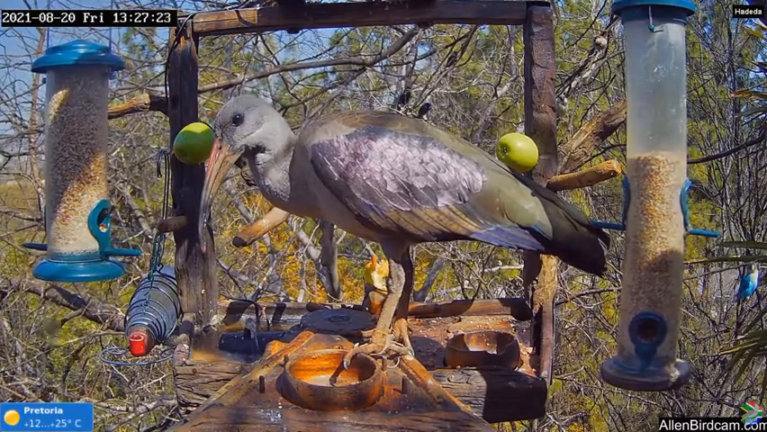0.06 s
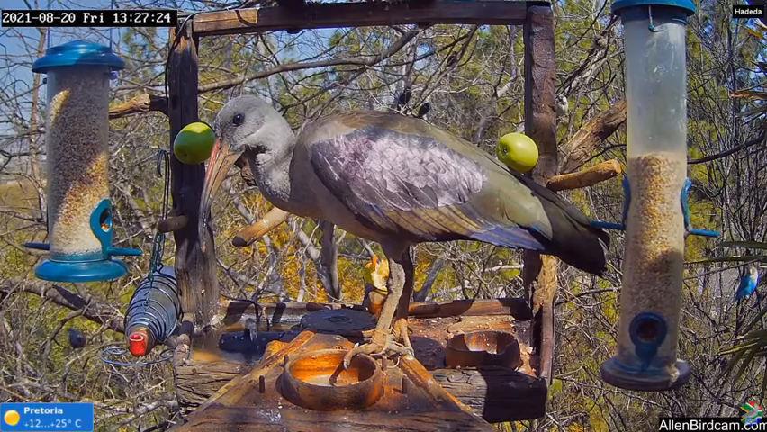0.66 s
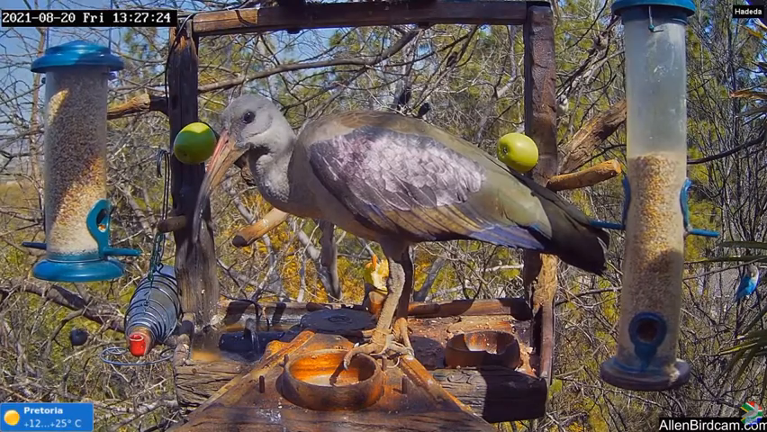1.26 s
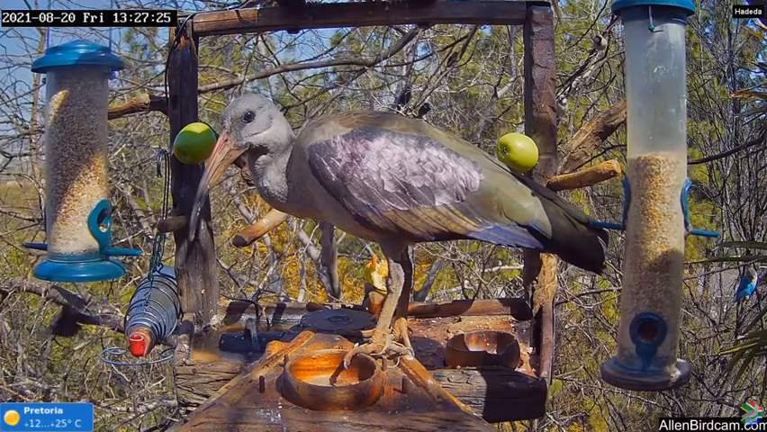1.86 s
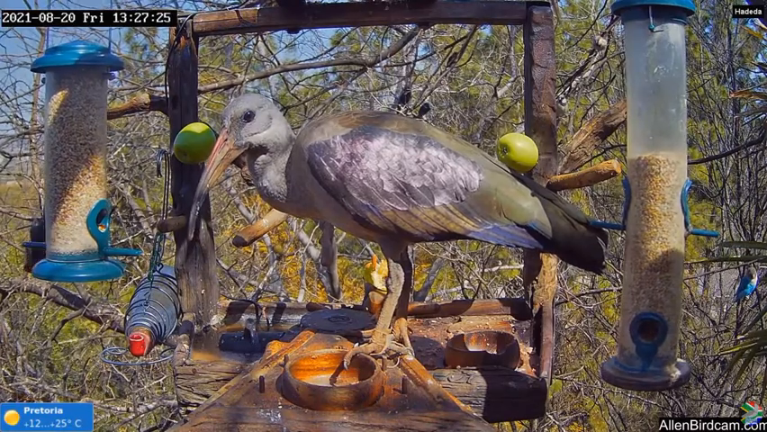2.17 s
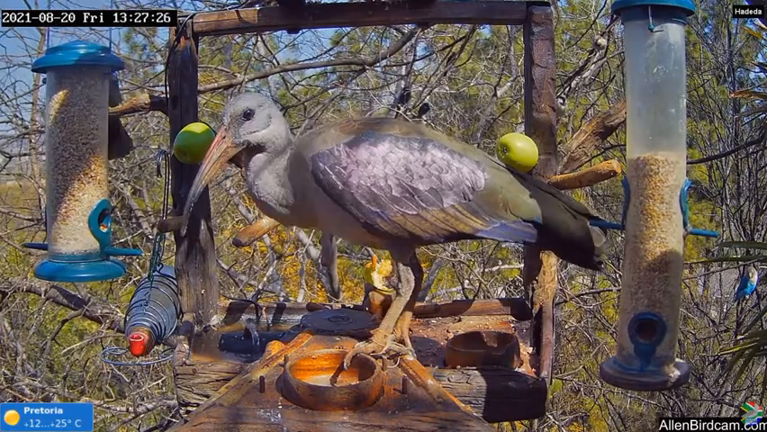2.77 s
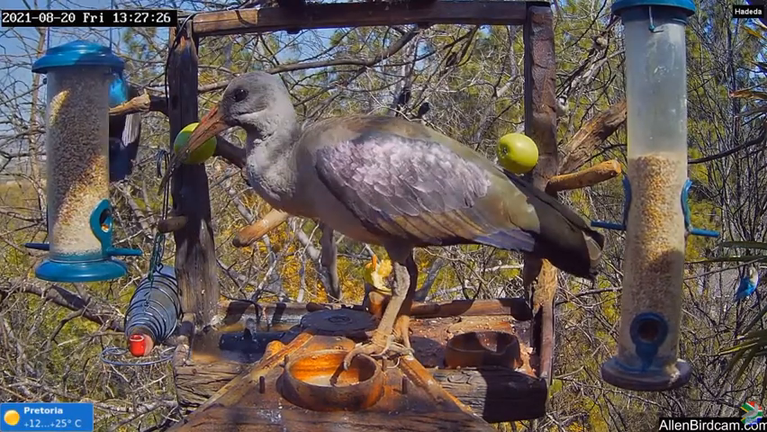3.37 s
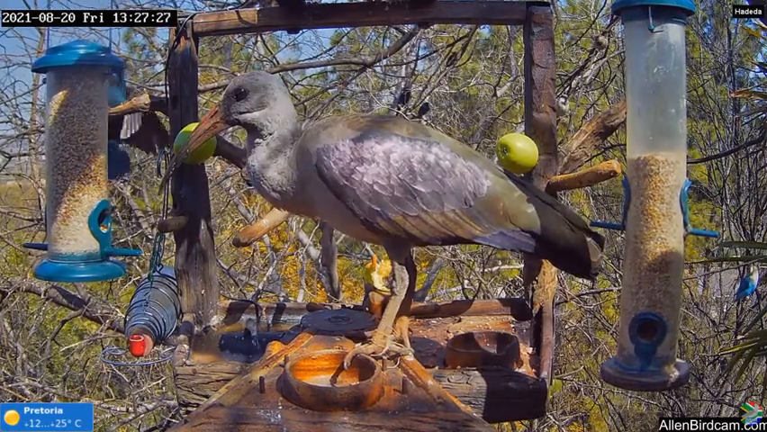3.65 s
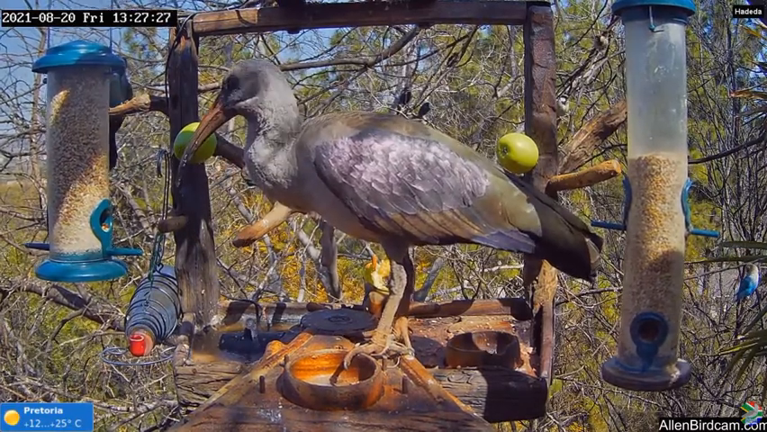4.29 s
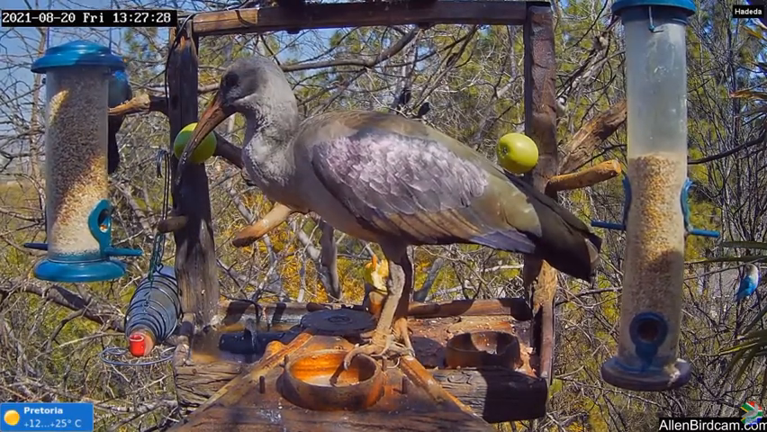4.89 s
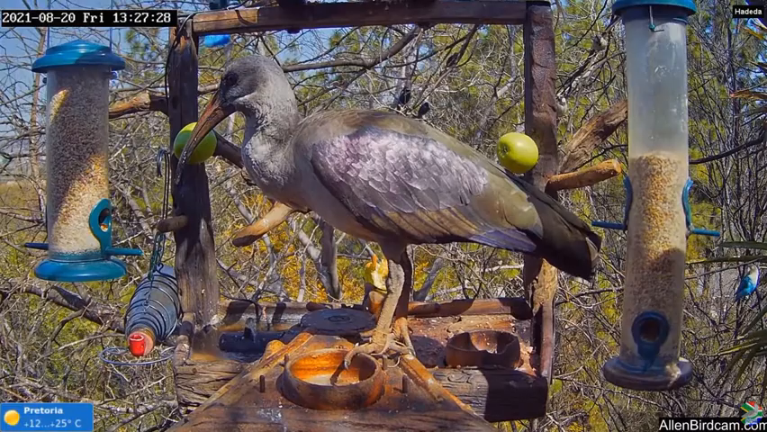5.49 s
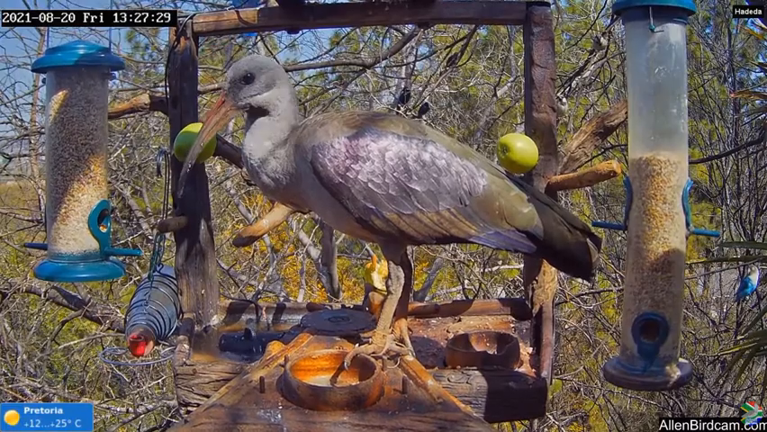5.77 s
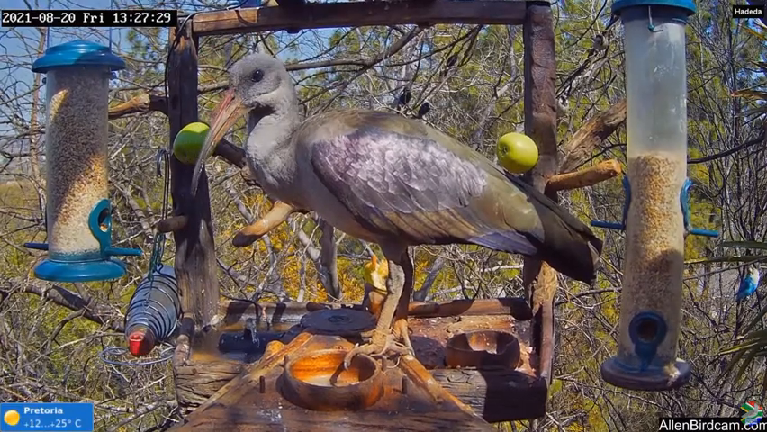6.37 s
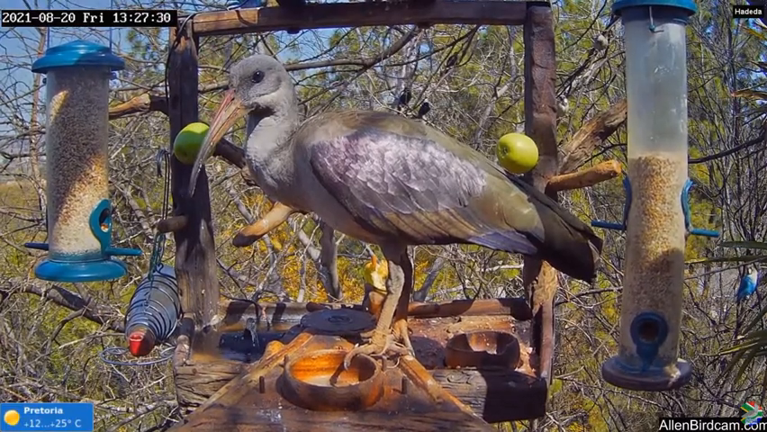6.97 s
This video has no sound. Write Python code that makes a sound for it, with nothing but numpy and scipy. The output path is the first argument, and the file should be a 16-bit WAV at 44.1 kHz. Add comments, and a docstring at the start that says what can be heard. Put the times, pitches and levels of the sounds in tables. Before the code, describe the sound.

Close, regular chirps and a quick burst of harsh squeaks sound over faraway birdsong and a soft wind rumble.

```python
"""Small birds at a garden feeder

Close to the microphone one bird repeats a sharp falling chirp, a near-pure tone from the syrinx, while
others squabble in harsh, overdriven squeaks. Wings puff air, beaks tap, the feeder shudders at a landing.
Further off in the dry trees, which scatter every call, are whistles, twitter, a pulsing churr and doves.
Light wind rumbles on the microphone over quiet garden air and, late on, a faint drone."""
import sys
import numpy as np
from scipy import signal
from scipy.fft import rfft, irfft
from scipy.io import wavfile
from scipy.ndimage import uniform_filter1d

SR = 44100
rng = np.random.default_rng(int(sys.argv[2]) if len(sys.argv) > 2 else 0)


def dump(signal):
    """Clip the signal to [-1, 1] and save it as 16-bit WAV at the path in sys.argv[1]."""
    limited = np.clip(np.atleast_2d(signal).T, -1, 1)
    pcm = np.round(limited * 32767).astype(np.int16)
    wavfile.write(sys.argv[1], SR, pcm)


N = 310464
T = np.arange(N) / SR

# Table levels are relative: each source's trim and the mix in scene() come on top.
# spectrum of the garden air: f/Hz, level/dB
AIR_SPECTRUM = [(30, -4.5), (70, -1), (130, -2.5), (220, -6.5), (310, -2), (400, -11.5), (530, -7.5),
                (800, -9.5), (1200, -20.5), (2200, -25.5), (4500, -31), (8000, -34), (15500, -39)]
# slow swell of the air's low part: t/s, level/dB
AIR_SWELL = [(0.1, -91), (2.62, -88.5), (3.55, -89.5), (4.21, -84), (6.9, -89)]
# wind on the microphone: t/s, slow eddies/dB, quick eddies/dB
GUSTS = [(0.02, -39, -50.5), (0.29, -35.5, -42.5), (0.33, -46, -44.5), (0.39, -38.5, -57.5),
         (0.55, -46.5, -54), (0.78, -41.5, -60.5), (1.07, -42.5, -44), (1.29, -43.5, -56.5),
         (1.58, -42.5, -49), (1.69, -47.5, -70.5), (1.97, -40.5, -52), (2.18, -44.5, -58.5),
         (2.22, -56.5, -79), (2.44, -53, -69), (2.57, -40.5, -55.5), (2.86, -44.5, -64.5), (2.92, -68, -54),
         (3.25, -75, -88), (3.8, -71.5, -80.5), (3.88, -47, -66), (4.04, -58, -74), (4.29, -45.5, -54.5),
         (4.4, -53.5, -68), (4.7, -48.5, -61.5), (5.85, -64, -91), (6.16, -52, -62), (6.22, -54, -77),
         (7.02, -65, -89)]
# spectra of the slow and the quick eddies: f/Hz, level/dB
SLOW_EDDY_SPECTRUM = [(10, -8.5), (22, 0), (40, -11.5), (55, -20), (90, -43.5), (200, -96.5)]
QUICK_EDDY_SPECTRUM = [(30, -28.5), (55, 8.5), (70, 0.5), (100, -8), (140, -19.5), (250, -37.5),
                       (600, -85.5)]
# distant flocks: start/s, end/s, centre f/Hz, spread/octaves, note length/s, level/dB, notes per second
FAR_FLOCKS = [(0, 7, 2860, 0.54, 0.048, -87.5, 9.5), (1.092, 4.0, 5050, 0.4, 0.017, -84, 22),
              (5.3, 7.03, 5700, .36, 0.018, -77.5, 120), (5.297, 6.9, 8700, .3, 0.0079, -88, 80)]
# coos of the nearest dove: t/s, length/s, f/Hz, level/dB
DOVE_COOS = [(.375, 0.039, 491.4, -66), (.46, 0.058, 508.5, -65.5), (.52, 0.046, 530.6, -63.5),
             (.605, 0.045, 506, -67.5), (.725, 0.029, 505.7, -64.5), (.785, 0.023, 531, -63),
             (.935, 0.045, 484, -67.5), (.97, 0.028, 537, -60.5), (1.84, 0.088, 547, -75.5),
             (6.05, 0.11, 544, -74), (6.48, 0.12, 525, -79)]
# bouts of churring: start/s, loudest/s, end/s, level/dB
CHURR_BOUTS = [(3.89, 4.525, 4.88, -77), (5.113, 5.561, 6.39, -65)]
# pulsing of the churr: t/s, rate/Hz
CHURR_PULSE_RATE = [(3.9, 46.6), (5.2, 35), (5.42, 46.6), (5.63, 47.3), (6.35, 50.6)]
# throat resonance of the churring bird: f/Hz, level/dB
CHURR_THROAT = [(650, -16.5), (1100, -11.5), (1420, -5), (1740, 0.5), (2170, -5.5), (2310, -2),
                (2610, -0.5), (3340, -8.5), (3650, -14), (3960, -16.5), (4920, -12.5), (5300, -27),
                (5600, -41), (7280, -63), (12300, -120)]
# whistles from the trees, and at 3.727 s the held tone that ends one chirp: t/s, length/s, first f/Hz, middle
# f/Hz, last f/Hz, level/dB
WHISTLE_NOTES = [(0.243, 0.031, 2840, 2837, 2910, -66.5), (0.444, 0.074, 3110, 2006, 2070, -69),
                 (0.524, 0.028, 4500, 4310, 3640, -74), (0.558, 0.11, 2800, 3480, 3380, -71.5),
                 (0.588, 0.026, 2960, 2390, 2190, -72.5), (0.611, 0.044, 3280, 3140, 3890, -74),
                 (0.752, 0.042, 2730, 2190, 2070, -79.5), (0.818, 0.12, 1737, 1675, 1756, -73.5),
                 (0.964, 0.11, 1707, 1718, 1610, -74.5), (1.036, 0.074, 1717, 1647, 1636, -72),
                 (1.383, 0.23, 2946, 2679, 2596, -73), (1.754, 0.039, 3430, 3585, 3760, -73),
                 (1.815, 0.085, 3450, 3500, 2940, -84.5), (2.159, 0.12, 1930, 2935, 1910, -66.5),
                 (2.21, 0.12, 2650, 1520, 2060, -78), (2.254, 0.072, 3700, 2934, 2600, -71),
                 (2.323, 0.04, 2610, 3026, 1980, -72), (2.438, 0.052, 2450, 2180, 2070, -70.5),
                 (2.696, 0.089, 2080, 1847, 2050, -77), (2.861, 0.058, 2837, 2847, 2850, -70),
                 (2.915, 0.22, 2000, 2420, 2430, -86.5), (3.37, 0.096, 1980, 2660, 2210, -69),
                 (3.391, 0.21, 2030, 1776, 2310, -69.5), (3.531, 0.052, 2085, 2510, 2170, -69),
                 (3.574, 0.068, 1986, 1610, 1526, -69), (3.577, 0.025, 3800, 3400, 3280, -59.5),
                 (3.727, 0.1, 3400, 3060, 2990, -57), (4.762, 0.042, 3180, 3390, 3100, -69),
                 (5.072, 0.03, 3010, 2315, 2050, -60.5), (5.799, 0.071, 2450, 2184, 2173, -70),
                 (6.647, 0.036, 3096, 2470, 2010, -62), (6.884, 0.021, 3230, 2510, 2170, -65),
                 (6.975, 0.057, 2400, 2130, 2100, -65.5)]
# thin buzzy twitter, and at 1.134 and 3.806 s the high ring and tail of the close chips: t/s, length/s, first
# f/Hz, last f/Hz, level/dB
TWITTER_NOTES = [(0.097, 0.17, 5630, 5420, -81.5), (0.096, 0.19, 6220, 6070, -84.5),
                 (1.134, 0.045, 5300, 5800, -61), (1.619, 0.027, 5120, 7150, -64.5),
                 (2.123, 0.045, 6200, 5260, -68.5), (2.163, 0.084, 6570, 5170, -68.5),
                 (2.713, 0.28, 7870, 8440, -87), (2.927, 0.11, 6630, 4320, -74.5),
                 (3.118, 0.23, 4520, 3930, -82.5), (3.713, 0.096, 6365, 5690, -69),
                 (3.806, 0.03, 5210, 5440, -61.5), (4.389, 0.012, 6640, 6370, -57),
                 (5.289, 0.033, 6280, 6810, -56), (5.502, 0.051, 7040, 5070, -66.5),
                 (5.715, 0.032, 6120, 5960, -67.5), (5.83, 0.089, 6180, 6740, -72),
                 (5.954, 0.048, 6580, 5900, -70), (6.04, 0.041, 7100, 6530, -70),
                 (6.128, 0.022, 4460, 5302, -62.5), (6.152, 0.031, 5890, 7116, -70.5),
                 (6.261, 0.046, 5290, 6648, -70.5), (6.316, 0.037, 6180, 6590, -68),
                 (6.396, 0.026, 6900, 6200, -74), (6.429, 0.0055, 5830, 5400, -53),
                 (6.447, 0.017, 5120, 5140, -68), (6.537, 0.048, 6480, 6080, -63),
                 (6.599, 0.057, 6895, 6210, -68), (6.763, 0.049, 5392, 4830, -73),
                 (6.828, 0.03, 6675, 6230, -67),]
# wing flutters: t/s, length/s, level/dB
FLUTTERS = [(2.426, 0.076, -66), (2.545, 0.1, -67), (2.814, 0.087, -68), (4.986, 0.076, -65.5)]
# beak taps on the feeder: t/s, level/dB
BEAK_TAPS = [(1.732, -70.5), (3.147, -86)]
# throat and beak resonances of the squabbling birds: f/Hz, level/dB
BEAK_SPECTRUM = [(1400, -38.5), (1900, -15.5), (2300, -3), (3200, -5), (4500, 0.5), (5500, -4.5),
                 (6800, -1), (7700, -9), (8700, -10), (10000, -27), (11200, -18), (12000, -62.5),
                 (13200, -25), (15500, -33.5)]
# creaking pulses that lead into squeaks: t/s, level/dB
CREAK_PULSES = [(4.7446, -46), (4.757, -43.5), (4.767, -64), (4.9866, -52), (4.9923, -53), (5.0013, -45)]
# close squeaks: t/s, length/s, first f/Hz, middle f/Hz, last f/Hz, level/dB, roughness,
# warble as a share of the pitch, echo/dB
SQUEAK_NOTES = [ (1.128, 0.054, 2520, 2264, 2430, -65, .7, .04, -2.5),
                (2.011, 0.074, 2930, 2500, 2690, -73, 0.61, 0, -3),
                (3.803, .024, 2667, 2840, 2930, -61, 1.06, 0.0092, 0),
                (4.404, 0.026, 2860, 2210, 2090, -61, .15, 0.016, -8),
                (4.431, 0.027, 1810, 2330, 1940, -59.5, 0.3, 0.042, -11),
                (4.453, 0.0098, 4380, 3430, 2470, -56, 0.05, 0.061, -5),
                (4.465, 0.025, 2050, 1870, 1920, -59, .15, 0.013, -15),
                (4.483, 0.025, 2670, 2810, 2690, -56.5, 0.32, 0, -8.5),
                (4.771, 0.015, 4640, 4600, 4660, -48, 0.86, 0, -14),
                (4.7805, 0.03, 4670, 4550, 4800, -38.5, 0.47, .11, -14),
                (4.805, 0.0089, 5700, 6450, 6550, -32.5, 0.37, 0.024, -16.5),
                (5.0077, 0.0053, 2670, 2950, 2370, -39.5, 0.25, 0, -11),
                (5.014, 0.028, 2248, 2156, 2244, -43.5, 0.05, 0.018, -17),
                (5.036, 0.011, 3960, 6260, 6850, -35, 0.42, 0.0027, -15),
                (5.199, 0.078, 2170, 2370, 2490, -67.5, 0.27, 0.017, -1),
                (5.254, 0.033, 2504, 2800, 2990, -61, 1.06, 0.041, -5),
                (6.72, 0.025, 2226, 2630, 2550, -63.5, 0.77, 0.12, 1.5)]
# the chirp's two-step fall, timed from its start: t/s, f/Hz, level/dB
CHIRP_FALL = [(.006, 2900, -17), (.017, 4380, -3.5), (.031, 4200, -2.5), (.045, 3540, -5.5),
              (.053, 4650, 1), (.0595, 2850, -11), (.068, 3450, -3), (.078, 3480, -1), (.114, 2580, -13)]
# its opening upstroke, from the other side of the syrinx: t/s, f/Hz, level/dB
CHIRP_UPSTROKE = [(-.014, 4400, -23.5), (.010, 5620, -6), (.014, 6200, -32.5)]
# each repeat of the chirp: t/s, level/dB, pitch ratio
CHIRP_CALLS = [(0.0507, -50.5, 0.98), (1.2601, -50.5, 1.007), (2.561, -50, 1), (3.6491, -50.5, 0.99),
               (4.697, -50.5, 1.0), (5.8915, -51, 1.002)]


def undb(db):
    """Decibels to gain."""
    return 10 ** (np.asarray(db) / 20)


def unit(x):
    """Scale to rms 1."""
    return x / (np.sqrt(np.mean(x ** 2)) + 1e-12)


def curves(rows, t):
    """The columns of a table, joined by straight lines over the times t, with rounded corners."""
    times, *columns = np.transpose(rows)
    return [uniform_filter1d(np.interp(t, np.sort(times), c), size=40, mode="nearest") for c in columns]


def response(spectrum, hz):
    """Gain of a spectrum (f/Hz, level/dB) at the given frequencies."""
    f, db = np.transpose(spectrum)
    return undb(np.interp(np.log(hz + 0.0011), np.log(f), db))


def colour(x, spectrum):
    """Filter by a spectrum (f/Hz, level/dB)."""
    return irfft(rfft(x) * response(spectrum, np.fft.rfftfreq(len(x), 1 / SR)), len(x))


def noise():
    """White noise for the whole scene."""
    return rng.standard_normal(N)


def noise_band(low_hz, high_hz, order=2):
    """Band-passed noise at rms 1."""
    bandpass = signal.butter(order, [low_hz, high_hz], "band", fs=SR, output="sos")
    return unit(signal.sosfilt(bandpass, noise()))


def wander(n, rate):
    """A random curve that takes a new value `rate` times a second."""
    return np.interp(np.arange(n) * rate / SR, np.arange(4096), rng.standard_normal(4096))


def add(out, start, x):
    """Mix x into out from `start` seconds on."""
    i = int(np.clip(start * SR, 0, N))
    out[i:i + len(x)] += x[:N - i]


def progress(length):
    """Runs from 0 to 1 over a note."""
    return np.linspace(0, 1, max(int(length * SR), 16))


def arch(u):
    """Rounded swell and fall of a note."""
    return np.abs(np.sin(np.pi * u)) ** 0.43


def phase_of(hz):
    """Phase of an oscillator that follows a pitch curve."""
    return 2 * np.pi * np.cumsum(hz) / SR


def bend_through(u, pitches_hz):
    """Pitch of a note that bends smoothly through its first, middle and last value."""
    return np.exp(np.polyval(np.polyfit([0, .5, 1], np.log(pitches_hz), 2), u))


def add_from_trees(paths, start, note, db, faint_db=-69.5):
    """Split a note between the direct and the scattered path; fainter birds sit deeper in the trees."""
    direct_share = 0.79 * undb(1.1 * min(db - faint_db, 0))
    add(paths[0], start, np.sqrt(direct_share) * note)
    add(paths[1], start, np.sqrt(1 - direct_share) * note)


def trees(x, early_s, late_s, late_db):
    """Scatter from near branches, then a thin tail from the trees behind."""
    t = np.arange(SR) / SR
    decay = np.exp(-t / early_s) + undb(late_db) * np.exp(-t / late_s)
    echoes = rng.standard_normal(len(t)) * decay * (t > .002)
    return signal.fftconvolve(x, echoes / np.sqrt(np.sum(echoes ** 2)))[:N]


def air(level_db=-79, swell_depth=0.76):
    """Far-off garden ambience: the low part swells slowly, the hiss stays even."""
    swell_db, = curves(AIR_SWELL, T)
    bed = unit(colour(noise(), AIR_SPECTRUM)) * undb(level_db)
    low = colour(bed, [(1000, 0), (1600, -10), (2500, -60)])
    drift_db = .8 * wander(N, 6)
    return bed - low + low * undb(swell_depth * (swell_db - np.median(swell_db)) + drift_db)


def hum(hz=99, db=-78, start_s=5.3):
    """A faint, unsteady drone fades in from far away."""
    envelope = undb(db + 2 * wander(N, 6.3)) * np.clip(T - start_s, 0, 1)
    return envelope * np.sin(phase_of(hz * (1 + 0.011 * wander(N, 5.4))))


def wind(trims_db=(2, 2.96), buffet_db=1.5, buffet_hz=14):
    """Slow and quick eddies swell with the breeze and buffet the microphone together."""
    out, buffets = 0, buffet_db * np.tanh(wander(N, buffet_hz))
    spectra = SLOW_EDDY_SPECTRUM, QUICK_EDDY_SPECTRUM
    for db, trim_db, spectrum in zip(curves(GUSTS, T), trims_db, spectra):
        eddies = colour(noise(), spectrum)
        strength = np.sqrt(uniform_filter1d(uniform_filter1d(eddies ** 2, size=3000), size=3000))
        out = out + eddies / strength * undb(db + trim_db + buffets)  # the gusts alone set the level
    return out


def far_doves(low_hz=290, high_hz=560, length=.09, count=36):
    """Barely audible coos from the furthest trees, each with its own time, pitch and strength."""
    out, u = np.zeros(N), progress(length)
    for i, (when, pitch, strength) in enumerate(rng.uniform(0, 1, (count, 3))):
        hz = (low_hz + (high_hz - low_hz) * pitch) * (1 + 0.05 * arch(u))
        coo = undb(-86 + 5 * strength) * arch(u) * np.sin(phase_of(hz))
        add(out, T[-1] * (i + when) / count, coo)
    return out


def twit(length, first_hz, last_hz, db, rasp=.034, overtone_db=-33):
    """One thin sliding note with a rasp on its pitch."""
    u = progress(length)
    slide_hz = first_hz + (last_hz - first_hz) * u
    phase = phase_of(slide_hz * (1 + rasp * wander(len(u), 1200)))
    envelope = arch(u ** 1.5) * undb(db + 3.6 * wander(len(u), 250))
    return envelope * (np.sin(phase) + undb(overtone_db) * np.sin(2 * phase))


def flocks():
    """Faint notes of many distant birds; after the squabble they thicken into a twitter."""
    out = np.zeros(N)
    for start, end, centre_hz, octaves, length, db, rate in FAR_FLOCKS:
        count = int(rate * (end - start))
        for i, (when, pitch, slide, strength) in enumerate(rng.uniform(-1.2, 1, (count, 4))):
            hz = centre_hz * 2 ** (octaves * pitch)
            note = twit(length * (1 + 0.27 * when), hz, hz * (.95 + 0.18 * slide), db + 4 * strength)
            add(out, start + (end - start) * (i + when) / count, note)
    return out


def dove(bend=0.07, waver=0.045):
    """Soft, hollow coos some way off, each a little higher in its middle."""
    out = np.zeros(N)
    for start, length, hz, db in DOVE_COOS:
        u = progress(length)
        pitch = hz * (1 + bend * (arch(u) - .8) + waver * wander(len(u), 120))
        add(out, start, undb(db) * arch(u) * np.sin(phase_of(pitch)))
    return out


def churr(swell_db=13.5, sag_db=6.5, sag_s=0.16, fade_s=0.085, brightening=0.4):
    """A dry rattle from the trees: noisy pulses through a broad throat resonance, duller when soft."""
    rate, = curves(CHURR_PULSE_RATE, T)
    cycles = np.cumsum(rate * (1 + .025 * wander(N, 40))) / SR
    since_pulse = cycles % 1 / rate
    pulses = (.33 + np.exp(-since_pulse / .006)) * undb(1.5 * wander(N, 45))
    effort = 0
    for start, loudest, end, db in CHURR_BOUTS:  # each swells, sags to a plateau and stops
        swell = swell_db * np.minimum((T - loudest) / (loudest - start), 0)
        sag = sag_db * (np.exp(-np.maximum(T - loudest, 0) / sag_s) - 1)
        gate = np.clip(np.minimum(T - start, end - T) / fade_s, 0, 1)
        effort = effort + undb(db + swell + sag) * gate
    rattle = unit(colour(noise() * pulses, CHURR_THROAT))
    body = colour(rattle, [(2600, 0), (3000, -20), (4000, -40)])
    return effort * (body + (rattle - body) * (effort / effort.max()) ** brightening)


def whistles(overtone_db=-33, waver=.012, flutter_db=2.5, trim_db=0.88):
    """Pure, bending notes from the trees, and the held tone after one chirp; returns the direct and the
    scattered sound."""
    paths = np.zeros((2, N))
    for start, length, *pitches_hz, db in WHISTLE_NOTES:
        u = progress(length)
        phase = phase_of(bend_through(u, pitches_hz) * (1 + waver * wander(len(u), 250)))
        envelope = arch(u ** 0.71) * undb(db + trim_db + flutter_db * wander(len(u), 90))
        tone = np.sin(phase) + undb(overtone_db) * np.sin(2 * phase)
        add_from_trees(paths, start, envelope * tone, db)
    return paths


def twitter(trim_db=1.2):
    """Thin notes that stand out in front of the flocks, and the high ring of two close chips; returns the
    direct and the scattered sound."""
    paths = np.zeros((2, N))
    for start, length, first_hz, last_hz, db in TWITTER_NOTES:
        add_from_trees(paths, start, twit(length, first_hz, last_hz, db + trim_db), db)
    return paths


def wings(beat_hz=24, feather_db=-27):
    """Each wingbeat pushes a low puff of air, with a faint rustle of feathers."""
    envelope = np.zeros(N)
    for start, length, db in FLUTTERS:
        u = progress(length)
        beats = 1 + 0.15 * np.cos(2 * np.pi * beat_hz * length * u)
        add(envelope, start, undb(db) * arch(u) * beats)
    return envelope * (noise_band(172, 336, order=3) + undb(feather_db) * noise_band(920, 6200))


def feeder(landing_s=2.87, hz=66, db=-46, t60_s=0.42):
    """The feeder's mount shudders after a bird lands."""
    t = np.maximum(T - landing_s, 0)
    return undb(db - 60 * t / t60_s) * np.sin(2 * np.pi * hz * t)


def taps(ring_s=0.0025):
    """Tiny dry clicks of a beak on the plastic feeder."""
    strikes = sum(undb(db) * (T >= at) * np.exp(-np.abs(T - at) / ring_s) for at, db in BEAK_TAPS)
    return strikes * noise_band(6000, 8500)


def creaks(throat_hz=2450, ring_s=0.00085):
    """Close by, lone slaps of the syrinx ring the throat for a moment."""
    out, t = np.zeros(N), np.arange(SR // 100) / SR
    envelope = 1.37 * t / ring_s * np.exp(-t / ring_s)
    for start, db in CREAK_PULSES:
        phase = phase_of(throat_hz * (1 + 0.061 * wander(len(t), 2000)))
        ring = sum(response(BEAK_SPECTRUM, k * throat_hz) ** .5 * np.sin(k * phase) for k in range(1, 6))
        add(out, start, undb(db) * envelope * ring)
    return out


def squeaks(warble_hz=162.5, rasp_hz=600, attack_share=0.12, release_share=0.23):
    """Close by, a hard-driven syrinx sounds through the beak; returns that and its share for the trees."""
    direct, to_trees = np.zeros((2, N))
    for start, length, *pitches_hz, db, rough, warble, echo_db in SQUEAK_NOTES:
        u = progress(length)
        swing = 1 - warble * np.cos(2 * np.pi * warble_hz * length * u)
        hz = bend_through(u, pitches_hz) * swing
        phase = phase_of(hz * (1 + .08 * rough * wander(len(u), 1500)))
        # gentle calls lose more per octave of harmonics; rough ones are brighter, with less fundamental
        slope_db = 0.7 + 0.12 * (db + 41) + rough ** 2
        fundamental = undb(-7 * rough ** 2) * np.sin(phase)
        overtones = sum(undb(slope_db * np.log2(k)) * np.clip((18000 - k * hz) / 2000, 0, 1)
                        * np.sin(k * phase) for k in range(2, 9))
        turbulence = 1 + 0.949 * rough * wander(len(u), 2400)  # in the throat; widens every harmonic
        rasp_db = 6 * rough * np.tanh(wander(len(u), rasp_hz))
        warble_db = 32 * np.log2(swing)  # loudest at the top of each swing
        envelope = np.minimum(u / attack_share, 1) * np.minimum((1 - u) / release_share, 1)
        note = (fundamental + overtones) * turbulence * envelope * undb(db + rasp_db + warble_db)
        add(direct, start, note)
        add(to_trees, start, note * undb(echo_db))
    return colour(direct, BEAK_SPECTRUM), colour(to_trees, BEAK_SPECTRUM)


def chirps(buzz_hz=370, quaver_hz=210, quaver_from_s=0.091, attack_s=0.0026, release_s=.01):
    """The main bird: a buzzy upstroke, then a near-pure tone falls in two steps and quavers as it dies."""
    out, t = np.zeros(N), np.arange(CHIRP_UPSTROKE[0][0], CHIRP_FALL[-1][0], 1 / SR)
    fall_hz, fall_db = curves(CHIRP_FALL, t)
    up_hz, up_db = curves(CHIRP_UPSTROKE, t)
    gate = np.clip((t - CHIRP_FALL[0][0]) / attack_s, 0, 1) * np.clip((t[-1] - t) / release_s, 0, 1)
    quaver_depth = 0.085 * np.clip((t - quaver_from_s) / 0.023, 0, 1)
    overtone = undb(np.interp(t, [.04, .06], [-23, -33]))  # the second step is purer
    for start, db, pitch_ratio in CHIRP_CALLS:
        quaver = quaver_depth * np.sin(phase_of(quaver_hz * (1 + 0.14 * wander(len(t), 120))))
        phase = phase_of(fall_hz * pitch_ratio * (1 + quaver + 0.0069 * wander(len(t), 300)))
        fall = gate * undb(fall_db) * (np.sin(phase) + overtone * np.sin(2 * phase))
        buzz = 0.11 * np.sin(2 * np.pi * buzz_hz * t) + 0.03 * wander(len(t), 1500)
        upstroke = undb(up_db) * (t < CHIRP_UPSTROKE[-1][0]) * np.sin(phase_of(up_hz * (1 + buzz)))
        add(out, start + t[0], undb(db) * (fall + upstroke))
    return out


def scene():
    """One microphone by the feeder: the further off a bird, the more of it comes by way of the trees."""
    squeak, squeak_echo = squeaks()
    whistle, whistle_echo = whistles()
    twits, twits_echo = twitter()
    chirp, clicks = chirps(), creaks() + taps()
    rattle, coos, distant = churr(), dove(), flocks() + far_doves()
    near_send = undb(-8.5) * (chirp + clicks) + squeak_echo
    far_send = (whistle_echo + twits_echo + distant + undb(-17) * chirp + undb(-24) * squeak
                + undb(-5) * rattle + undb(-2) * coos)
    near = trees(near_send, early_s=0.02, late_s=0.059, late_db=-19)
    far = trees(far_send, early_s=.028, late_s=0.077, late_db=-15.5)
    direct = chirp + squeak + clicks + whistle + twits + rattle + undb(2) * coos + undb(-8.5) * distant
    return (direct + near + far + wings() + feeder() + wind() + hum() + air())[None]


def record(dry, top_hz=15500):
    """The camera's microphone channel cuts the top treble steeply."""
    return signal.sosfilt(signal.ellip(8, .2, 70, top_hz, fs=SR, output="sos"), dry)


dry = scene()
out = record(dry)
dump(out)
```